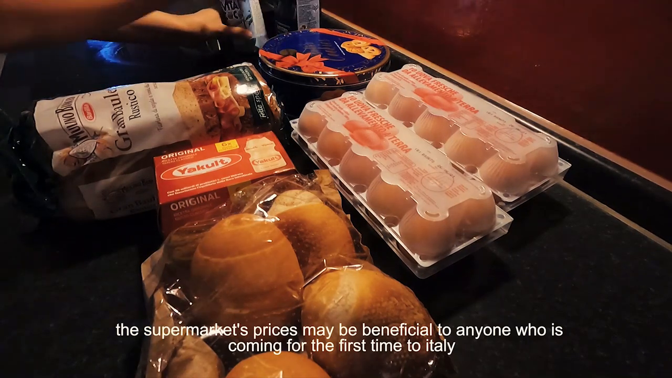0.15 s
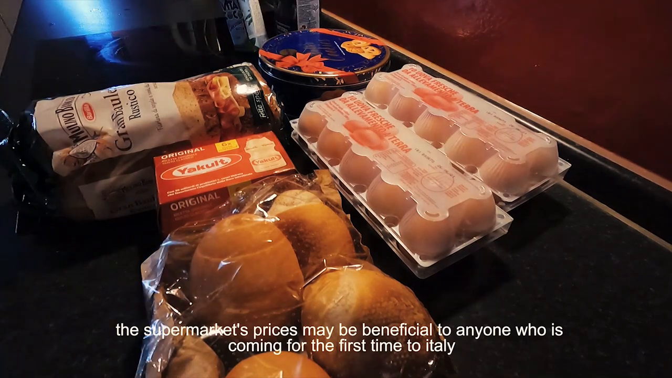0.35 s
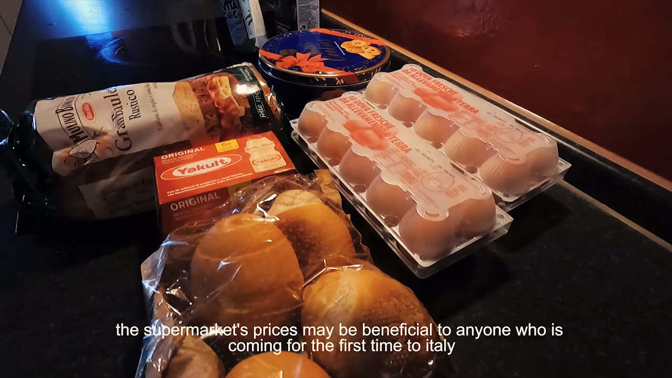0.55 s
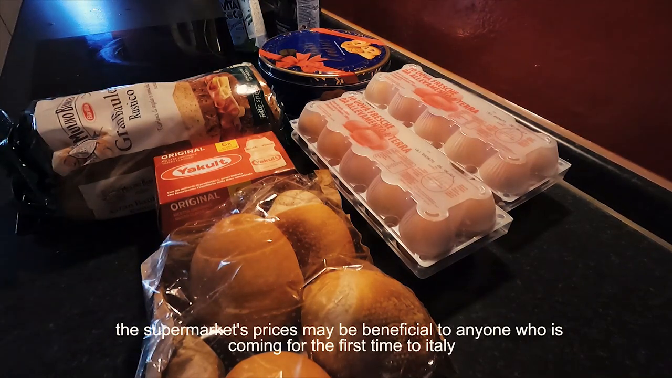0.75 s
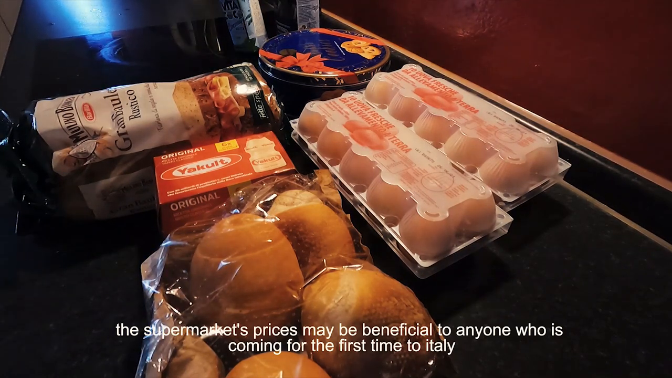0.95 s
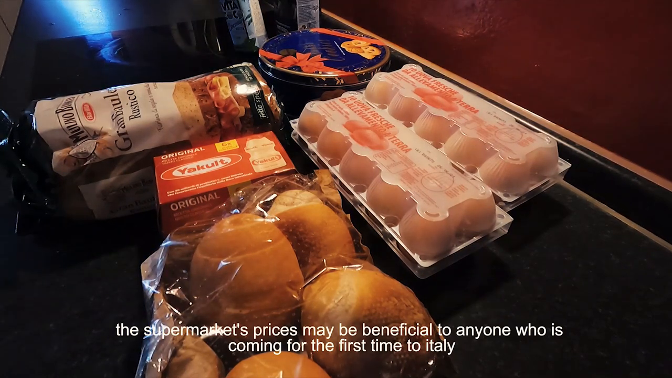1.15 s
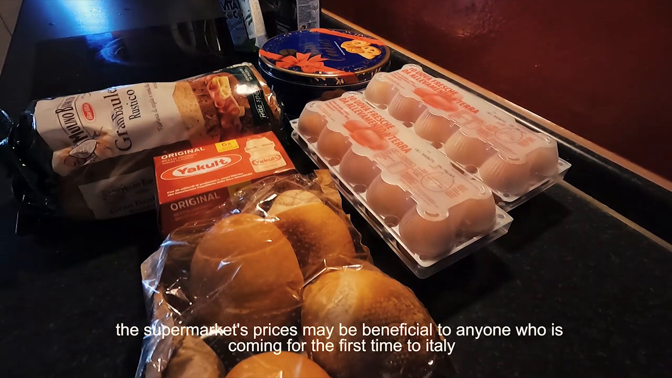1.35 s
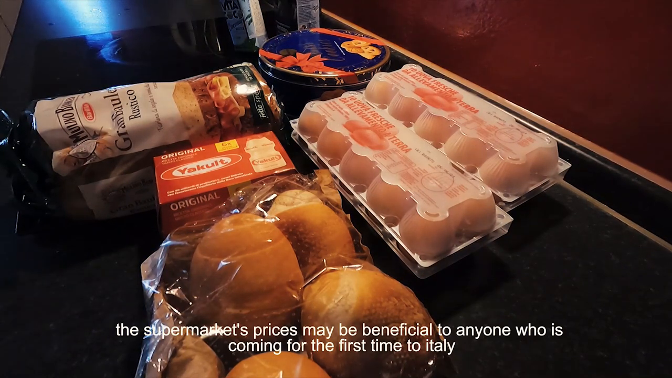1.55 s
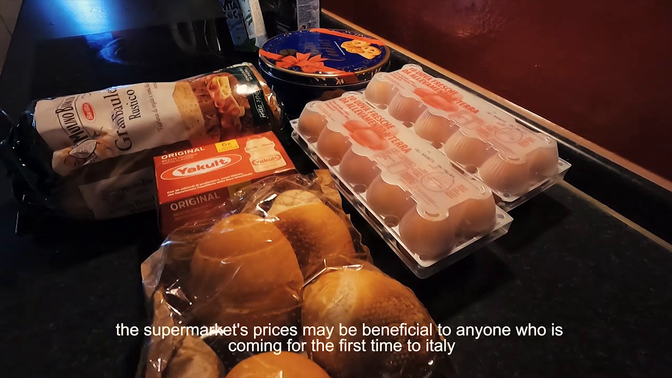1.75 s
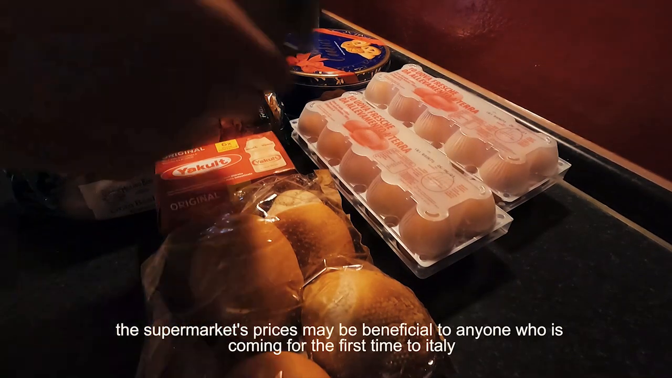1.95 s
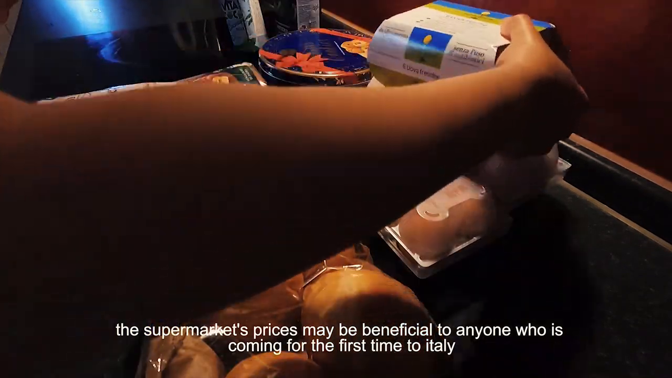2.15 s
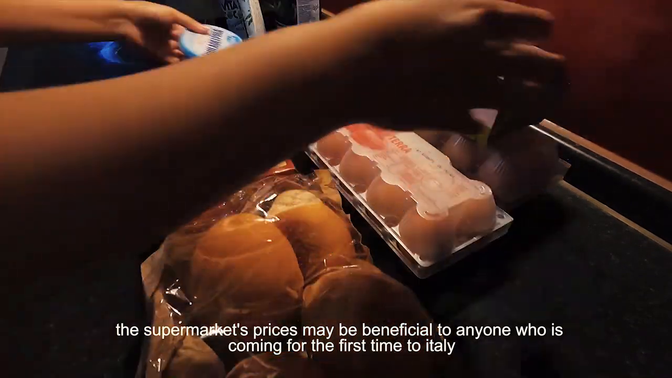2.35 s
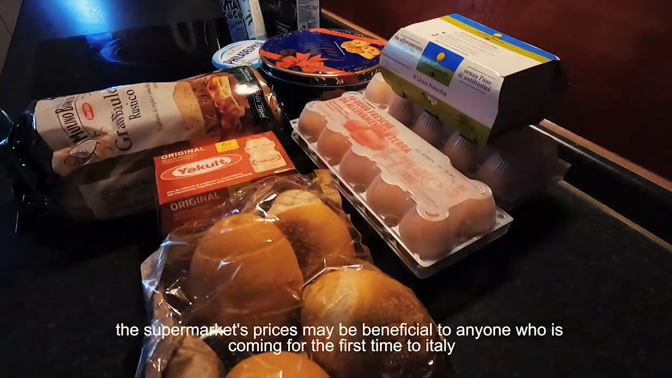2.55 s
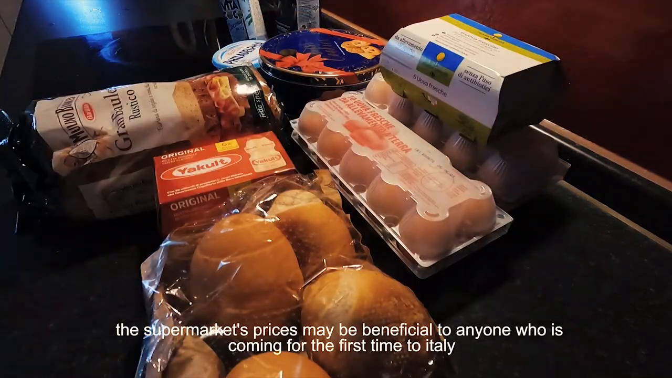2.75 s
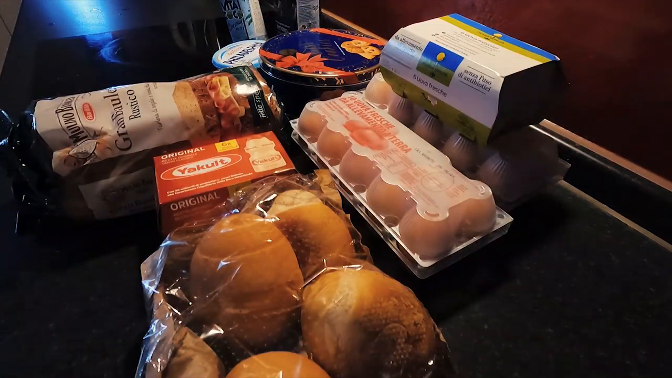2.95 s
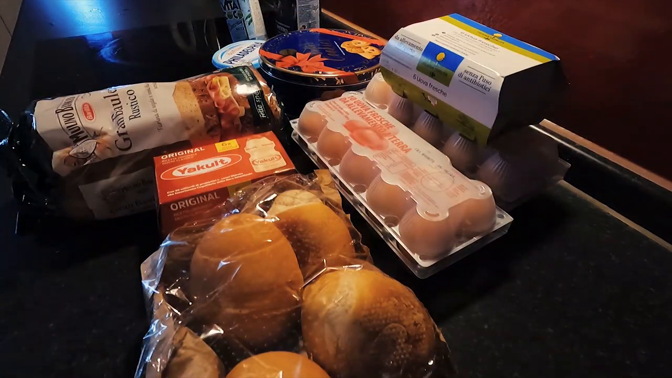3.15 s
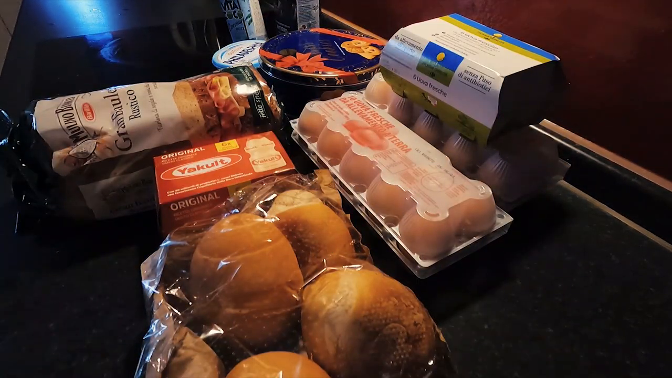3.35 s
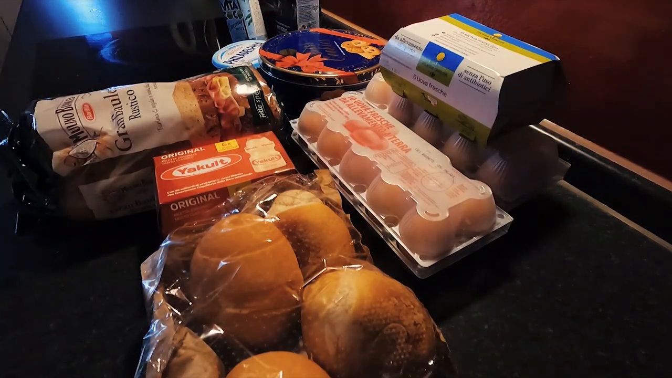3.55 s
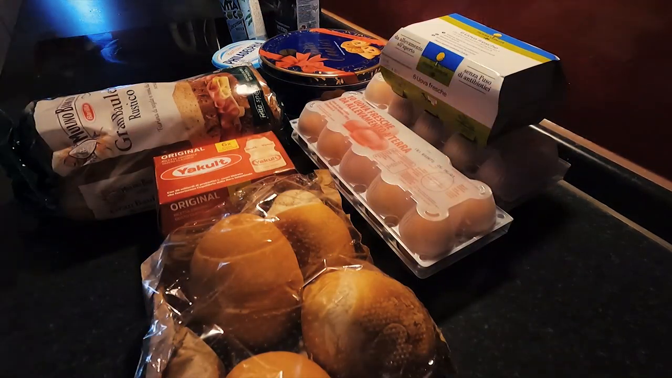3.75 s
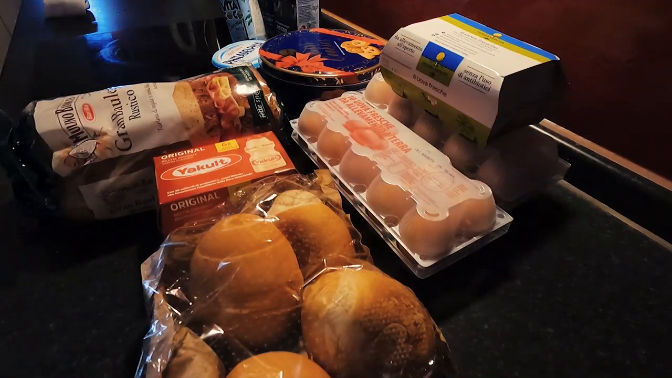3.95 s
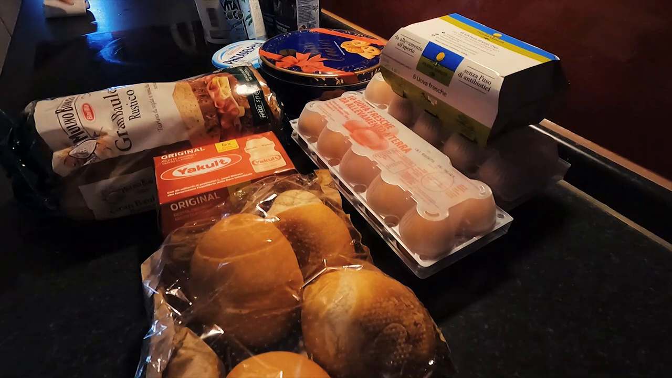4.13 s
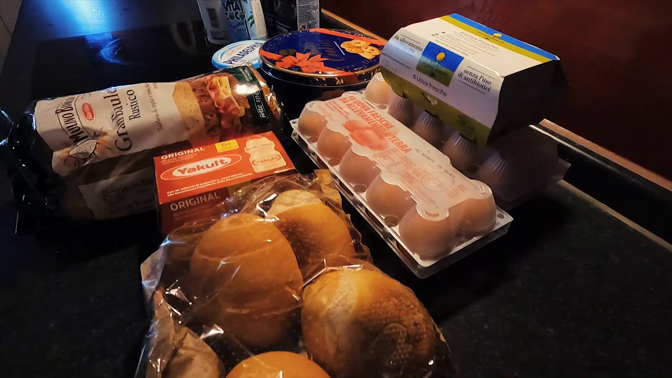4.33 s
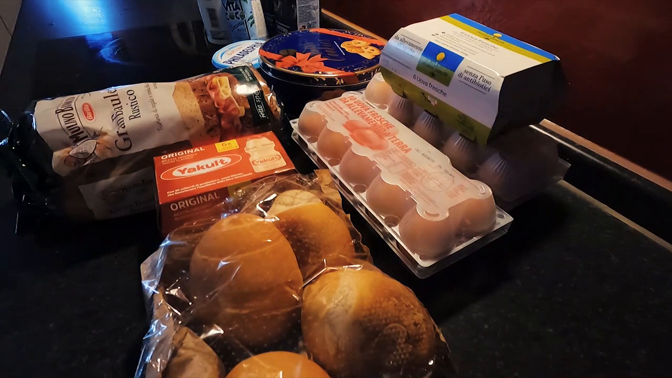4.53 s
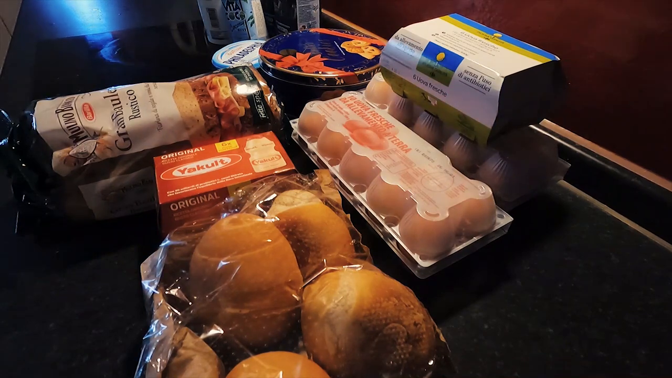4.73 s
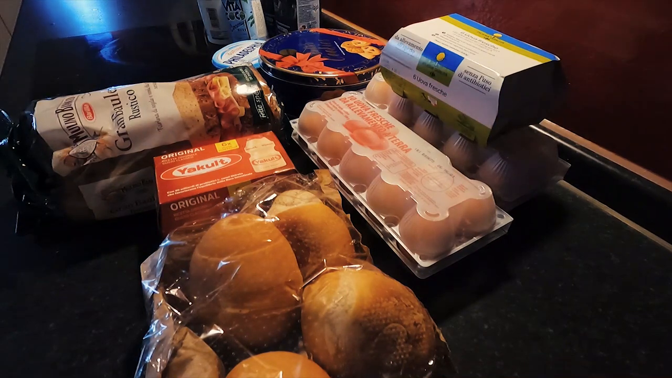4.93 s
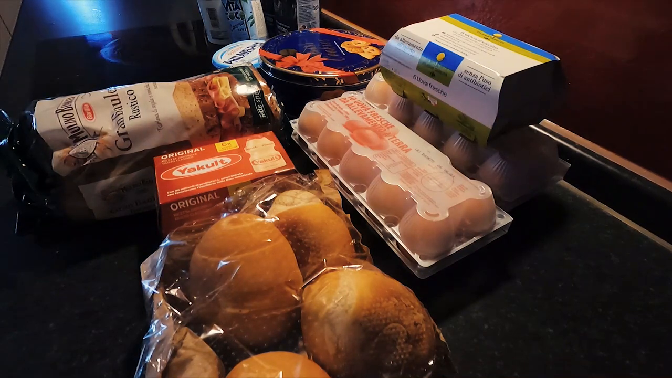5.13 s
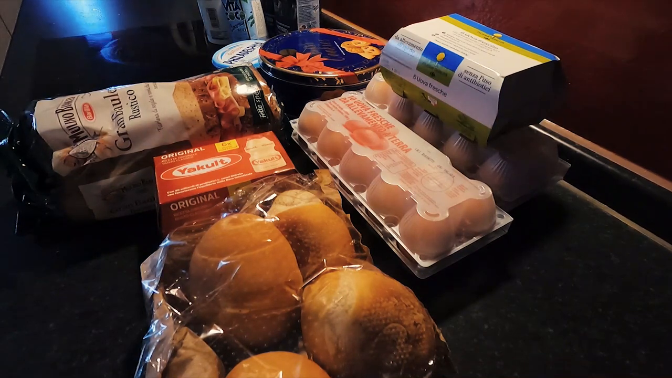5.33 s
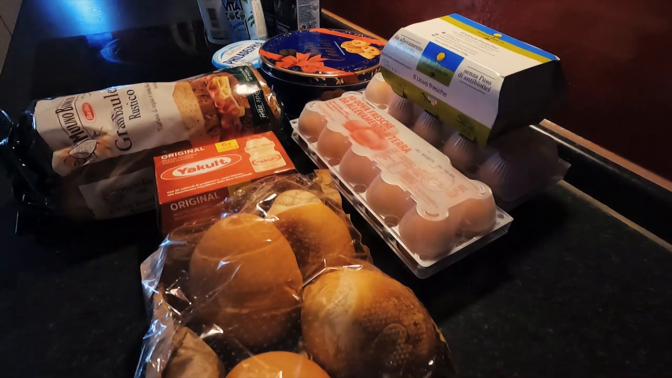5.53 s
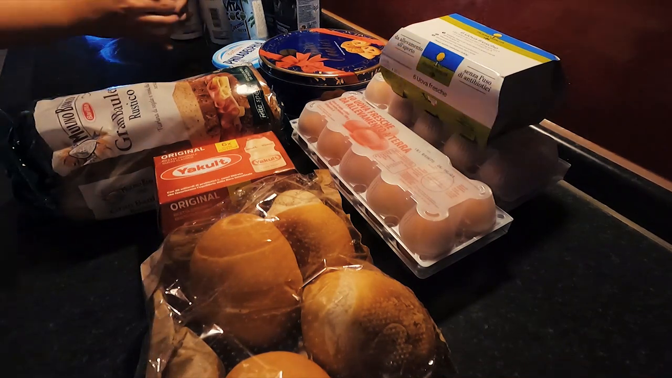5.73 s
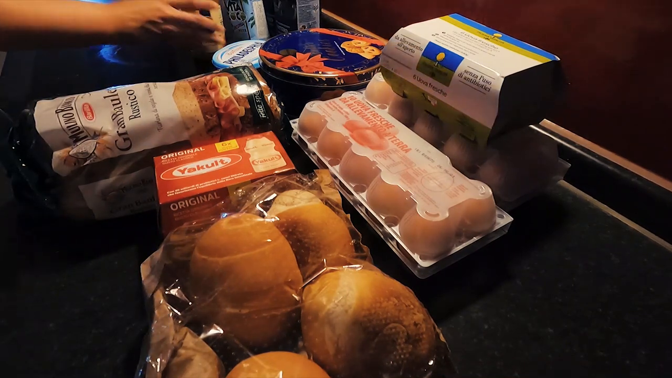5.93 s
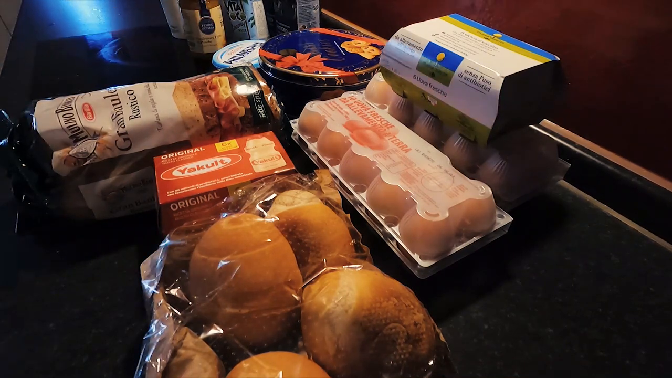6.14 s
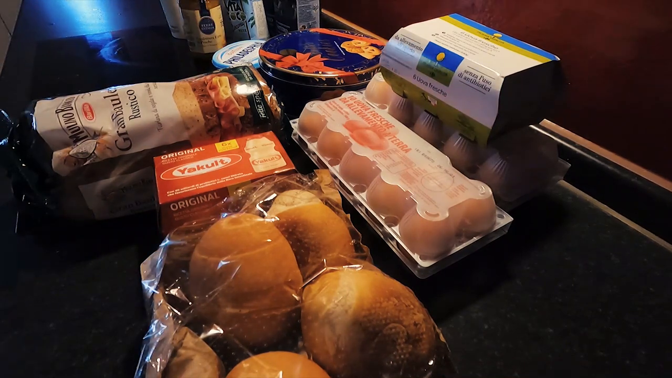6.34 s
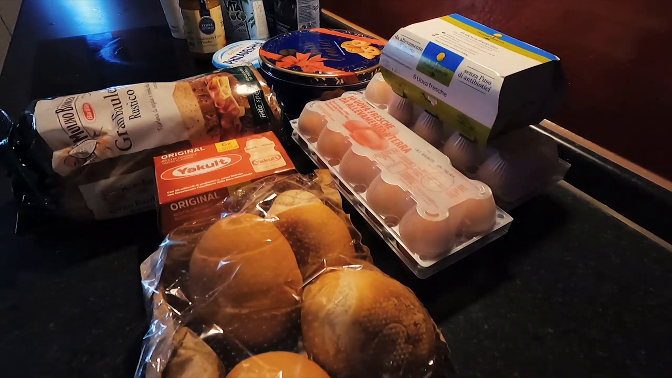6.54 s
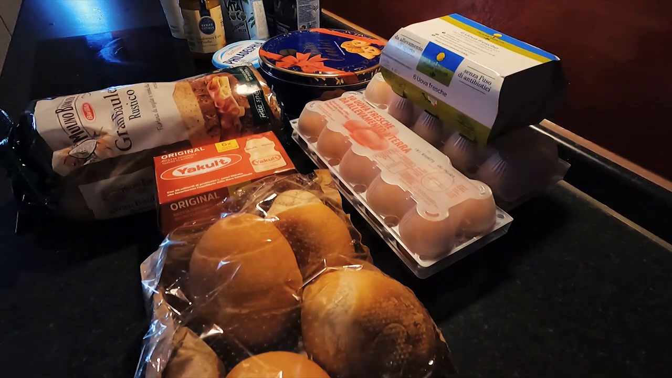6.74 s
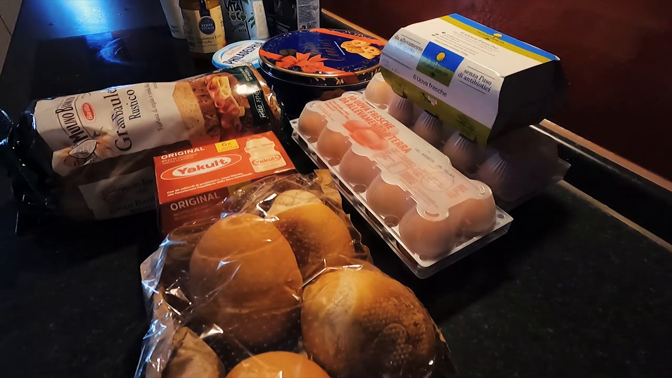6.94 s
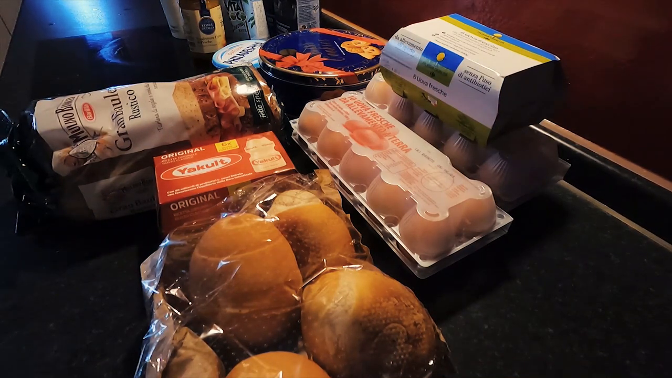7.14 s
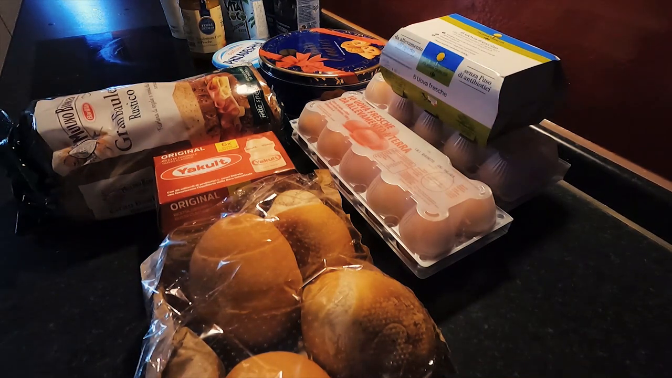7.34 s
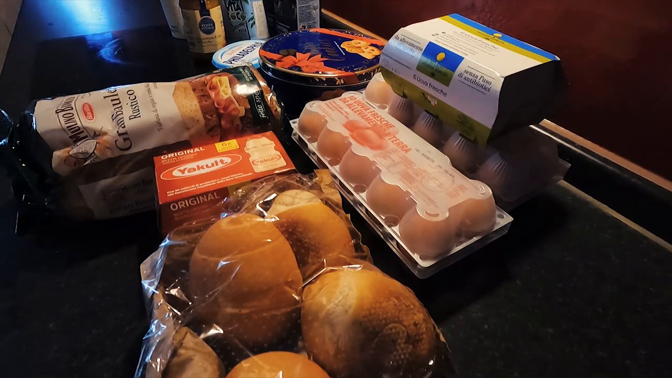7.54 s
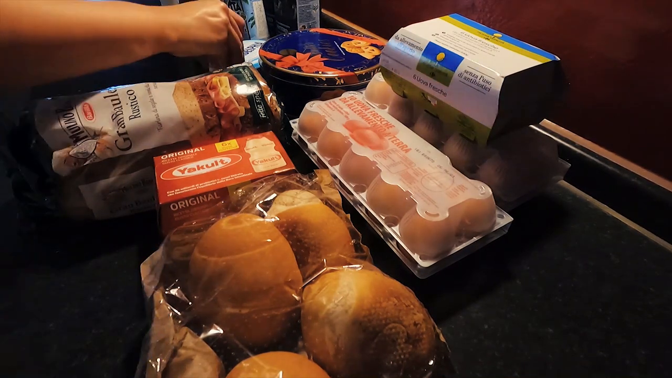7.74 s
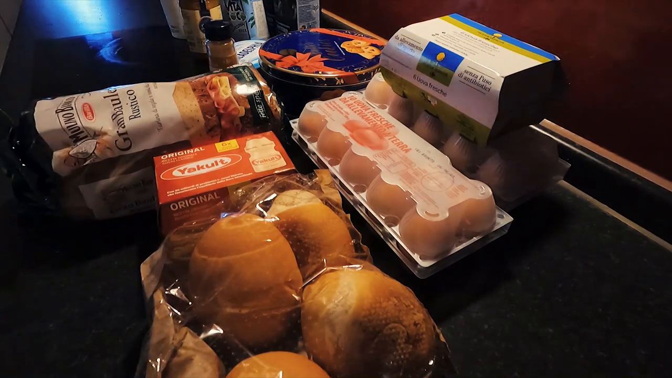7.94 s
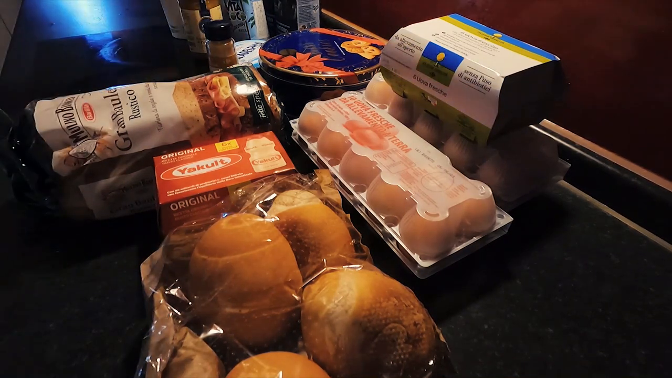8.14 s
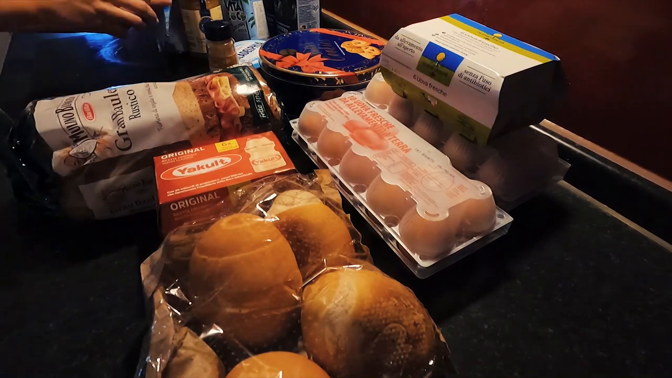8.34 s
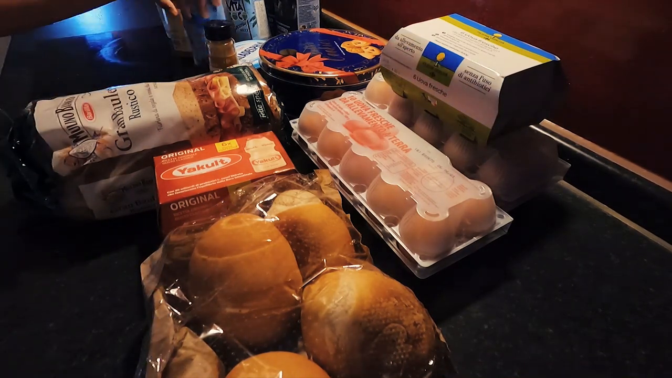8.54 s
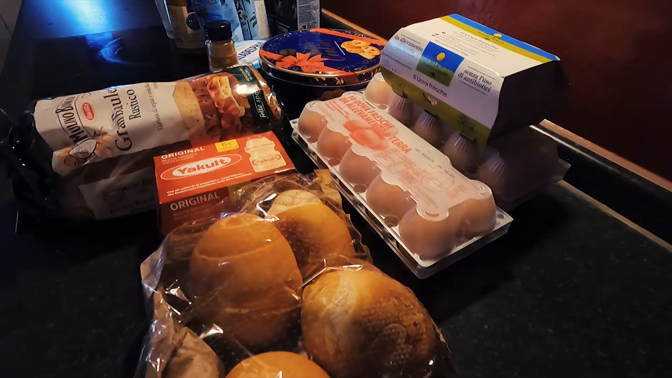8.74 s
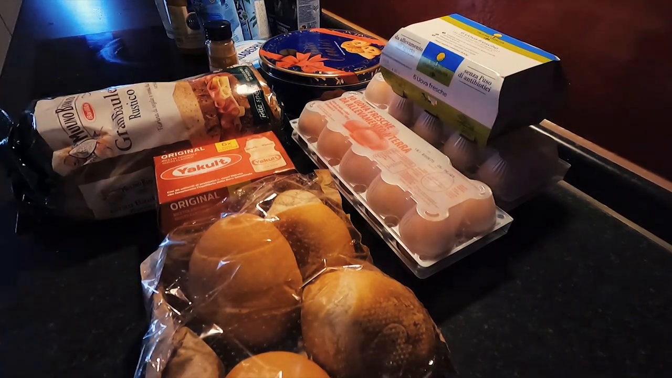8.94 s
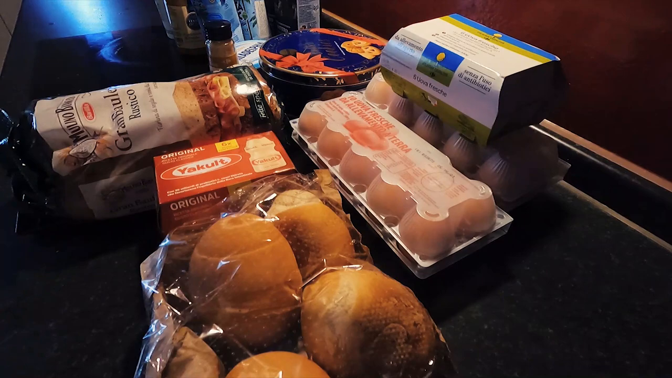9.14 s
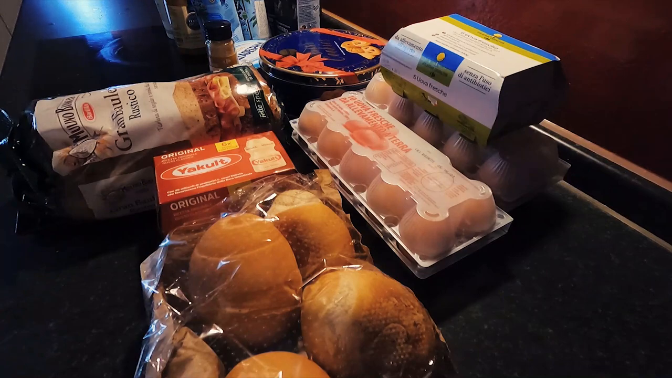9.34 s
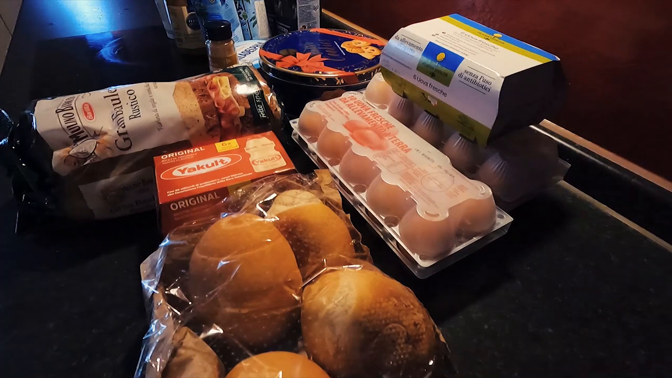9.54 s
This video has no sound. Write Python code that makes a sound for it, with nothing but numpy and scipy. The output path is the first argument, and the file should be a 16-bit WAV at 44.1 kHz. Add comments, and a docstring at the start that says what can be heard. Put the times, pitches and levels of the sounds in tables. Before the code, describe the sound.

Groceries are set down on a kitchen counter: a thin plastic egg carton crackles, then packs and a bottle knock and thud between soft rustles.

```python
"""A small, dry kitchen: groceries are set down on the counter, close to a small stereo microphone.
Footfalls and soft loads thud as damped counter modes; packs and a bottle knock with body, wall and edge.
A thin plastic egg carton snaps in short noise bursts over a hollow shell; packs scuff and wrappers rustle
as sprays of tiny slips. Weight shudders in low noise, and a fine hiss wavers over a soft, hollow drone."""
import sys
import numpy as np
from scipy import signal
from scipy.io import wavfile
from scipy.ndimage import uniform_filter1d, map_coordinates

SR = 44100
rng = np.random.default_rng(int(sys.argv[2]) if len(sys.argv) > 2 else 0)


def to_wav(sig):
    """Store sig (one row per channel, or 1-D mono) as 16-bit WAV at the path in sys.argv[1].

    Samples outside -1..1 are clipped; the rate is SR.
    """
    pcm = np.clip(np.atleast_2d(sig), -1, 1) * 32767
    pcm = np.round(pcm).astype(np.int16)
    wavfile.write(sys.argv[1], SR, pcm.T)  # frames by channels


N = 426869
TIME = np.arange(N) / SR
HIT = TIME[:SR // 5]  # time axis of one short event, 0.2 s
HZ = np.fft.rfftfreq(4096, 1 / SR)  # frequency axis of the spectral filters


def amp(db):
    """Decibels to gain."""
    return np.exp(np.asarray(db) * (np.log(10) / 20))


def read(points, hz):
    """A spectrum read on a log-frequency axis."""
    f, value = np.transpose(points)
    return np.interp(np.log(hz + 1), np.log(f + 1), value)


def follow(curve):
    """A dB curve as a gain for every sample."""
    return amp(np.interp(TIME, *np.transpose(curve)))


def evened(x):
    """Scales to rms 1."""
    return x / np.sqrt(np.mean(x ** 2) + 1e-20)


def struck(x):
    """Scales a hit so that its energy equals 10 ms at rms 1."""
    energy = np.sum(x ** 2, -1, keepdims=True)
    return x / np.sqrt(energy / (.01 * SR) + 1e-20)


def add(mix, s, sound):
    """Mixes a sound in at time s, in seconds."""
    part = mix[:, max(round(s * SR), 0):][:, :sound.shape[-1]]
    part += sound[..., :part.shape[1]]


def colour(x, points, tilt=0):
    """Causal, minimum-phase filter with the given spectrum, tilted above 1 kHz by dB per octave."""
    octaves = np.log2(np.maximum(HZ / 1000, 1))
    log_gain = np.log(amp(read(points, HZ) + tilt * octaves))
    circle = np.concatenate([log_gain, log_gain[-2:0:-1]])
    # the Hilbert transform of the log gain supplies the phase
    response = np.exp(np.conj(signal.hilbert(circle)))
    taps = np.fft.ifft(response).real[:len(HZ) // 2]
    return signal.oaconvolve(x, taps[None], axes=1)[:, :x.shape[1]]


def band(x, low_hz, high_hz, order):
    """Causal band-pass."""
    return signal.sosfilt(signal.butter(order, [low_hz, high_hz], "band", fs=SR, output="sos"), x)


def ring(modes, contact, detune):
    """Dying modes, driven by a smooth push that lasts for the contact time in seconds."""
    sound = np.zeros(len(HIT))
    for hz, db, t60 in modes:
        pitch = hz * (1 + detune * rng.standard_normal())
        sound += amp(db - 60 * HIT / t60) * np.cos(2 * np.pi * pitch * HIT)
    push = np.sin(np.pi * np.minimum(HIT / contact, 1)) ** 2
    return signal.fftconvolve(sound, push)[None, :len(HIT)]


def rebounds(x, share, mean_gap):
    """Nearby surfaces return a few quick, uneven copies of a blow."""
    taps = np.zeros(len(HIT))
    delays = np.minimum(0.00393 + np.cumsum(rng.exponential(mean_gap, size=9)), .15)
    signs = rng.choice([-1, 1], size=9)
    taps[(delays * SR).astype(int)] = share * signs * np.exp(-delays / .028)
    taps[0] = 1
    return signal.fftconvolve(x, taps[None], axes=1)[:, :len(HIT)]


def crack(points, decay, rise, chatter, tilt=0):
    """A burst of coloured noise; the surfaces chatter a few times before they settle."""
    envelope = np.exp(-HIT / decay) * (1 - np.exp(-HIT / rise))
    contacts = np.zeros(len(HIT))
    delays = np.minimum(rng.exponential(0.0086, size=4), .04)
    contacts[(delays * SR).astype(int)] = chatter * rng.random(size=4) * np.exp(-delays / 0.036)
    contacts[0] = 1
    envelope = signal.fftconvolve(contacts, envelope)[:len(HIT)]
    return struck(colour(rng.standard_normal((2, len(HIT))) * envelope, points, tilt))


def grains(size, per_s, spread_db, smooth):
    """Tiny slips of uneven size over a smooth rubbing noise."""
    sizes = amp(spread_db * np.minimum(rng.exponential(1, size), np.pi))
    slips = (rng.random(size) < per_s / SR) * sizes
    slips = evened(slips * rng.choice([-1., 1.], (2, size)))
    return evened(slips + smooth * rng.standard_normal((2, size)))


def ripple(depth_db, size):
    """Random narrow peaks and dips, in dB for every bin."""
    chance = rng.standard_normal(len(HZ))
    return depth_db * evened(signal.fftconvolve(chance, np.hanning(size), "same"))


def creased(points, depth_db):
    """A spectrum with the chance resonances of one fold of thin plastic."""
    return np.column_stack([HZ, read(points, HZ) + ripple(depth_db, size=35)])


def waver(seconds):
    """Smooth chance of rms 1 that changes over the given time."""
    knots = rng.standard_normal(N // 100)
    return evened(map_coordinates(knots, [TIME / seconds], order=3, mode="mirror"))


# Spectrum of the hollow drone in the room. Each row: frequency in Hz, relative level in dB.
DRONE_SPECTRUM = [(20, -21), (50, -19), (130, -23), (215, -13.5), (400, -21), (580, -22.5), (740, -5),
                  (930, -1), (1100, -12.5), (1350, -16.5), (1600, -12.5), (2600, -25), (5000, -26.5)]
# Faint hum in the middle of the image. Each row: frequency in Hz, level in dB.
HUM_TONES = [(936, -69), (1564, -78)]
# Spectrum of the fine hiss. Each row: frequency in Hz, relative level in dB.
HISS_SPECTRUM = [(1000, -38.5), (2500, -19), (4200, -26.5), (5400, -4.5), (7000, -2.5), (9500, -3.5),
                 (10400, -2.5), (11200, 3.5), (12200, -2.5), (14500, -3), (16000, -4.5)]
# Level of the hiss before it wavers. Each row: time in seconds, level in dB.
HISS_LEVEL = [(0.0, -62), (0.48, -60.5), (0.83, -59), (1.78, -57), (2.78, -61), (3.85, -56.5),
              (4.39, -61.5), (5.34, -56), (5.69, -60.5), (7.14, -58), (7.6, -68), (8.52, -66), (9.1, -66),
              (9.44, -56.5), (9.68, -60)]
HISS_WAVER_DB, HISS_WAVER_S = 2.2, .06  # rms depth and time scale of the random wavering


def background():
    """A soft hollow drone of noise with a thin, slightly drifting hum, under a fine, wavering hiss."""
    air = amp(-62.5) * evened(colour(rng.standard_normal((2, N)), DRONE_SPECTRUM))
    drift = waver(.12)
    for tone_hz, db in HUM_TONES:
        phase = 2 * np.pi * np.cumsum(tone_hz * (1 + 0.001736 * drift)) / SR
        air[0] += amp(db) * evened(np.sin(phase))
    _, _, z = signal.stft(rng.standard_normal((2, N)), SR, nperseg=512)
    # the hiss shimmers in narrow, slowly shifting patches
    patches = uniform_filter1d(rng.standard_normal(z.shape[1:]), size=2, axis=0)
    patches = evened(uniform_filter1d(patches, size=30, axis=1))
    shimmer = signal.istft(z * amp(2.8 * patches), SR)[1][:, :N]
    hiss = follow(HISS_LEVEL) * evened(colour(shimmer, HISS_SPECTRUM))
    return air + amp(HISS_WAVER_DB * waver(HISS_WAVER_S)) * hiss


# Decay of the small kitchen. Each row: frequency in Hz, time to fall 60 dB in seconds.
KITCHEN_DECAY = [(200, 0.12), (600, 0.053), (1500, 0.1), (5000, 0.1), (9000, 0.078), (15000, 0.08)]


def kitchen(x, wet_db, gap):
    """Close walls and cupboards return a short, dense tail that starts after the gap in seconds."""
    t = TIME[:SR // 2]
    taps = rng.standard_normal((2, len(t))) * (rng.random(len(t)) < 5000 / SR) * (t > gap)
    hz, at, z = signal.stft(taps, SR, nperseg=256)
    decay = amp(-60 * at / read(KITCHEN_DECAY, hz)[:, None])
    tail = signal.istft(z * decay, SR)[1]
    tail /= np.linalg.norm(tail, axis=1, keepdims=True)
    return x + amp(wet_db) * signal.oaconvolve(x, tail, axes=1)[:, :N]


# Packs and a bottle meeting the counter. Each row: start in seconds, body level in dB,
# favoured pitch of the ring in Hz, clack level in dB, click level in dB.
LANDINGS = [(0.118, -48, 910, -66, -66), (0.156, -48.5, 785, -56, -55), (1.79, -41, 770, -53, -46),
            (1.868, -43.5, 890, -47.5, -47.5), (2.467, -27.5, 496, -36.5, -37.5),
            (2.499, -26, 494, -44, -43), (2.541, -37.5, 775, -45.5, -47), (2.563, -50, 910, -69, -61),
            (3.285, -32.5, 800, -55, -39), (3.835, -43.5, 910, -79, -62), (3.93, -31.5, 482, -55, -51.5),
            (4.218, -27, 560, -43.5, -52), (4.263, -20.5, 535, -38.5, -36), (5.815, -40, 338, -41, -46),
            (5.926, -20.5, 620, -28, -24.5), (5.988, -36.5, 786, -40.5, -40.5),
            (6.097, -53.5, 856, -55.5, -55), (6.511, -47, 900, -76, -57), (6.757, -33.5, 470, -60, -45.5),
            (7.915, -43.5, 710, -56, -60), (8.218, -44, 845, -63, -52.5), (8.283, -35, 301, -47, -45.5),
            (8.318, -26.5, 322, -38, -40.5), (8.418, -43.5, 520, -56, -53.5), (8.442, -42.5, 484, -56, -78),
            (8.536, -46, 334, -53.5, -49.5), (8.586, -39, 725, -49.5, -48), (8.609, -27, 493, -36, -35.5),
            (8.626, -25.5, 574, -29, -26.5), (8.697, -42, 836, -50, -57)]
# Body modes of a pack. Each row: frequency in Hz, relative level in dB, 60 dB decay in seconds.
PACK_MODES = [(230, -11, .03), (310, -4, .035), (410, -5, .025), (495, 1, .06), (590, 0, .024),
              (700, 2, .03), (800, 3, .036), (890, 1, .04), (1130, -5, .04)]
# Stiff walls of the packs. Each row: frequency in Hz, relative level in dB, 60 dB decay in seconds.
WALL_MODES = [(1072, 4.5, 0.11), (1260, -8, 0.05), (1515, -23, 0.088), (2100, 3, .12), (2665, -38, 0.042),
              (2670, -25, 0.25), (3440, -9, 0.22)]
# Noise spectrum of the wall's clack. Each row: frequency in Hz, relative level in dB.
CLACK_SPECTRUM = [(500, -18.5), (1000, -4), (1450, 1.5), (1750, -1.5), (2050, -4), (2800, -6.5),
                  (3800, -7.5), (5500, -34), (9000, -50)]
# Noise spectrum of the edge's click. Each row: frequency in Hz, relative level in dB.
CLICK_SPECTRUM = [(1500, -38), (3300, -21), (4600, 5), (7500, 4), (9500, 1), (13000, -1.5), (16000, -9)]


def knocks():
    """A pack lands: its body rings, its wall clacks and its edge clicks."""
    bodies, tops = np.zeros((2, 2, N))
    for s, db, hz, clack_db, click_db in LANDINGS:
        # the place of contact favours the body modes near one pitch
        modes = [(f, level - 18 * abs(np.log2(f / hz)), t60) for f, level, t60 in PACK_MODES]
        body = band(ring(modes, contact=0.00079, detune=0.02), 225, 976, order=3)
        wall = struck(ring(WALL_MODES, contact=0.00024, detune=0.0099))
        clack = crack(CLACK_SPECTRUM, decay=0.0024, rise=0.0023, chatter=0.65) + 0.37 * wall
        click = crack(CLICK_SPECTRUM, decay=0.0013, rise=0.0014, chatter=0.53)
        add(bodies, s - .0004, amp(db) * struck(rebounds(body, share=0.15, mean_gap=.005)))
        add(tops, s, amp(clack_db) * clack)
        add(tops, s, amp(click_db) * click)
    return kitchen(bodies, wet_db=-5.5, gap=0.0069) + kitchen(tops, wet_db=-7.5, gap=.006)


# Dull thuds of feet and soft loads. Each row: start in seconds, level of the lower resonances in dB,
# hardness as the upper resonances over the lower in dB.
FEET_AND_LOADS = [(0.199, -44, -2.5), (0.473, -35, -8), (0.584, -41.5, -4), (0.675, -49.5, -7),
                  (1.675, -38.5, -17), (2.794, -35, 0), (3.446, -40.5, -10.5), (3.579, -33, -16),
                  (3.697, -45.5, -10), (3.93, -32.5, -22), (3.954, -35, 3), (4.522, -27.5, -2.5),
                  (4.632, -38.5, 0), (5.521, -42.5, -11.5), (5.653, -29, -6.5), (5.762, -40.5, -19),
                  (5.816, -26, -3.5), (6.242, -34.5, -7.5), (6.366, -41, -1), (7.448, -41, -8),
                  (7.573, -31.5, -6.5), (8.285, -29.5, -7.5), (8.295, -24.5, -1.5), (8.519, -33, -6),
                  (8.739, -39, -4), (8.954, -29, -2), (9.06, -39.5, -1.5)]
# Lower modes of the counter. Each row: frequency in Hz, relative level in dB, 60 dB decay in seconds.
COUNTER_LOW_MODES = [(155, -23, .06), (207, -12, .045), (288, 0, .048), (360, -5, .04)]
# Upper modes of the counter. Each row: frequency in Hz, relative level in dB, 60 dB decay in seconds.
COUNTER_HIGH_MODES = [(494.5, 7, 0.039), (694, -6, 0.04), (775, -8, 0.044), (946, -8.5, 0.083)]
THUD_PITCH_SPREAD = .05  # random spread of each mode's pitch from thud to thud, as a share


def thuds():
    """Each thud rings the same counter; harder ones reach its upper modes."""
    out = np.zeros((2, N))
    for s, db, hard_db in FEET_AND_LOADS:
        low = ring(COUNTER_LOW_MODES, contact=0.0016, detune=THUD_PITCH_SPREAD)
        low = rebounds(band(low, 162.0, 382, order=3), share=0.28, mean_gap=.0035)
        top = ring(COUNTER_HIGH_MODES, contact=0.00096, detune=THUD_PITCH_SPREAD)
        top = rebounds(band(top, 415, 960, order=4), share=0.26, mean_gap=0.0038)
        add(out, s - .0012, amp(db) * struck(low))
        add(out, s + 0.0007, amp(db + hard_db) * struck(top))
    return out


# Weight shifting against the counter. Each row: start in seconds, level at the height of the swell
# in dB, length in seconds (held to 0.2 at most).
WEIGHT_SHIFTS = [(0.323, -55.5, 0.076), (0.883, -38.5, 0.0055), (1.002, -52, 0.013), (2.136, -61, 0.09),
                 (2.792, -52, 0.021), (3.925, -48, 0.11), (4.723, -63, 0.23), (6.406, -44, 0.089)]
# Spectrum of the shudder before its band-pass. Each row: frequency in Hz, relative level in dB.
SHUDDER_SPECTRUM = [(20, -25), (50, 5), (110, 0.5), (160, -12), (260, -10), (420, -19), (900, 6.5),
                    (3000, -36)]
SHUDDER_HZ = 152  # middle of the band


def rumbles():
    """Shifting weight makes the counter shudder: low noise that swells and fades once."""
    out = np.zeros((2, N))
    for s, db, length in WEIGHT_SHIFTS:
        noise = colour(rng.standard_normal((2, len(HIT))), SHUDDER_SPECTRUM)
        shudder = evened(band(noise, SHUDDER_HZ / 1.35, SHUDDER_HZ * 1.6, order=2))
        swell = np.sin(np.pi * np.minimum(HIT / min(length, HIT[-1]), 1)) ** 2
        add(out, s, amp(db) * shudder * swell)
    return out


# Arm movements that stir sleeves and bags. Each row: start in seconds, length in seconds, level in dB.
ARM_MOVES = [(0.728, 0.56, -57), (1.157, 1, -56), (2.875, 0.93, -64.5), (4.612, 0.93, -60.5),
             (6.496, 1, -67.5)]
# Spectrum of sliding wrappers and packs. Each row: frequency in Hz, relative level in dB.
SLIDE_SPECTRUM = [(100, -30.5), (500, -21.5), (850, 8), (1250, -6), (1900, 4.5), (2800, -5.5), (5200, -1.5),
                  (8000, -6), (12000, -10.5), (16000, -20)]
MOVE_ATTACK_S, MOVE_RELEASE_S = 0.075, 0.36


def rustle():
    """Each movement swells, holds and fades; three folds crackle, each in its own clumps and colour."""
    folds = np.zeros((2, N))
    for fold in range(3):
        clumps = uniform_filter1d(rng.standard_normal(N), size=800)
        clumps = evened(uniform_filter1d(clumps, size=300))
        slips = grains(N, per_s=700, spread_db=5, smooth=.5) * amp(4.5 * clumps)
        folds += colour(slips, creased(SLIDE_SPECTRUM, depth_db=5), tilt=0.063)
    movement = np.zeros(N)
    for start, length, db in ARM_MOVES:
        attack = (TIME - start) / MOVE_ATTACK_S
        release = (start + length - TIME) / MOVE_RELEASE_S
        movement += amp(db) * np.clip(np.minimum(attack, release), 0, 1)
    return movement * evened(folds)


# Packs and wrappers sliding. Each row: start in seconds, level in dB before the stroke shapes it,
# brightness as a pitch in Hz that sets the tilt, length of the stroke in seconds.
SLIDES = [(0.741, -46, 5400, 0.021), (0.836, -45, 5660, 0.046), (0.8774, -42.5, 1770, 0.061),
          (0.959, -52, 5900, 0.12), (1.1644, -52, 1790, 0.076), (1.2878, -46.5, 2040, 0.1),
          (1.5255, -46.5, 3180, 0.093), (1.622, -41, 2400, 0.033), (1.788, -35, 2430, 0.027),
          (2.008, -41.5, 5020, 0.024), (2.302, -43.5, 4770, 0.06), (2.3607, -38, 8140, 0.021),
          (2.9637, -48, 1780, 0.057), (3.275, -40, 1980, 0.069), (3.6995, -43.5, 11600, 0.067),
          (4.894, -43.5, 1480, .1), (5.153, -51.5, 1420, 0.11), (5.2367, -51, 1440, 0.077),
          (5.3494, -47.5, 1520, .04), (5.4844, -56, 1690, 0.073), (6.508, -46.5, 1800, 0.057),
          (6.5903, -55, 1570, 0.33), (6.662, -46.5, 4300, 0.052), (6.752, -38, 2060, 0.045),
          (6.8827, -36.5, 3200, 0.021), (6.9205, -43.5, 2490, 0.11), (7.013, -48.5, 6950, 0.052),
          (7.198, -53, 1800, 0.056), (7.491, -47.5, 2150, 0.031), (7.638, -47.5, 5300, 0.018),
          (9.1744, -58, 1580, 0.12), (9.434, -46.5, 5540, 0.04)]


def scuffs():
    """Short slides swell quickly and die away in a spray of slips."""
    out = np.zeros((2, N))
    for s, db, hz, length in SLIDES:
        slips = grains(len(HIT), per_s=1800, spread_db=5, smooth=.5)
        surface = creased(SLIDE_SPECTRUM, depth_db=1.8)
        rub = evened(colour(slips, surface, tilt=3.65 * np.log2(hz / 3200)))
        stroke = (1 - np.exp(-HIT / 0.003)) * np.exp(-(HIT / (.5 * length)) ** 1.67)
        add(out, s - .003, amp(db) * stroke * rub)
    return out


# Thin plastic buckling. Each row: time of the snap in seconds, snap level in dB,
# brightness as a pitch in Hz that sets the tilt, level of the hollow shell in dB.
BUCKLES = [(0.8829, -48.5, 2190, -49.5), (1, -48.5, 2500, -54), (1.771, -47, 10500, -55),
           (1.793, -44, 2530, -45), (1.9376, -42, 4870, -49), (1.9468, -43.5, 2820, -62),
           (1.9674, -40, 5130, -39), (1.9934, -50, 4930, -44), (2.0176, -47.5, 5200, -43.5),
           (2.073, -54, 8900, -77), (2.175, -33, 6100, -37), (2.2731, -41, 4630, -41.5),
           (2.3128, -35.5, 7300, -50), (2.374, -37, 7860, -56), (2.6272, -67, 11900, -52),
           (3.0076, -44, 5680, -80), (3.0698, -52, 7510, -76), (3.68, -39, 15840, -59),
           (6.4387, -56.5, 7000, -55), (7.807, -29.5, 8060, -39), (7.8419, -28.5, 7800, -37.5)]
# Spectrum of the snap and its lead-in. Each row: frequency in Hz, relative level in dB.
SNAP_SPECTRUM = [(400, -16.5), (1200, -12), (2000, 5.5), (2700, -0.5), (4000, 6), (5200, 4.5), (8000, 5.5),
                 (11000, 2.5), (16000, -5)]
# Fold that flips in the carton's lid. Each row: frequency in Hz, relative level in dB,
# 60 dB decay in seconds.
FOLD_MODES = [(5070, 3, 0.013), (5490, 4.5, 0.013), (6300, -8, 0.008)]
# Hollow shell of the carton. Each row: frequency in Hz, relative level in dB, 60 dB decay in seconds.
SHELL_MODES = [(512, -2.5, 0.025), (755, -5, 0.042), (862, 0.5, 0.045), (1044, -10, 0.078),
               (1020, -1, 0.013)]
LEAD_IN_DB, SNAP_ROOM_DB = -8, -4.5  # lead-in against the snap's level; kitchen tail against the dry snap


def snaps():
    """Thin plastic snaps and rings its hollow shell; a faint spray of noise grains swells into each snap."""
    lead_ins, flips = np.zeros((2, 2, N))
    swell = np.exp(-HIT[::-1] / 0.0021)  # grows up to the snap
    for s, db, hz, shell_db in BUCKLES:
        plastic = creased(SNAP_SPECTRUM, depth_db=2)
        tilt = 5 * np.log2(hz / 6500)
        snap = crack(plastic, decay=0.0016, rise=0.00077, chatter=0.22, tilt=tilt)
        # the fold rings only in snaps pitched near 5200 Hz
        fold_share = 2.1 * np.exp(-(np.log2(hz / 5200) / 0.11) ** 2)
        snap += fold_share * struck(ring(FOLD_MODES, contact=.0001, detune=0.031))
        shell = ring(SHELL_MODES, contact=0.00022, detune=0.032)
        shell = struck(band(shell, 205, 1320, order=2))
        spray = grains(len(HIT), per_s=540, spread_db=8, smooth=0.19)
        lead_in = evened(colour(spray, SNAP_SPECTRUM)) * swell
        add(lead_ins, s - HIT[-1], amp(db + LEAD_IN_DB) * lead_in)
        add(flips, s, amp(db) * snap + amp(shell_db) * shell)
    return lead_ins + kitchen(flips, wet_db=SNAP_ROOM_DB, gap=0.0027)


def stereo(x, width):
    """Mid and side to left and right, with the side coloured by the width."""
    side = colour(x[1:], width)[0]
    return np.array([x[0] + side, x[0] - side])


# Stereo width of the close handling. Each row: frequency in Hz, side minus mid in dB.
HANDLING_WIDTH = [(40, -22), (130, -13.5), (280, -34), (550, -81), (1100, -25), (2200, -14.5), (4500, -8.5),
                  (12000, -8)]
# Stereo width of the room air. Each row: frequency in Hz, side minus mid in dB.
ROOM_WIDTH = [(60, -6.5), (150, -10.5), (380, -12), (950, -7), (2380, -3.5), (5980, -4), (15000, -4)]


def scene():
    """The handling is close and nearly central; the room air is wider."""
    handling = knocks() + snaps() + kitchen(scuffs(), wet_db=-2.5, gap=.003)
    handling += thuds() + rustle() + rumbles()
    return stereo(handling, HANDLING_WIDTH) + stereo(background(), ROOM_WIDTH)


EDGE_HZ = 16150  # upper band limit


def record(dry):
    """At the stereo microphone the treble leans slightly left; then the band limit."""
    lean = colour(dry, [(1500, -34.0), (5000, -19), (12000, -17.0)])  # Hz, dB
    lean *= np.array([[1], [-1]])  # added on the left, taken away on the right
    low_pass = signal.firwin(301, EDGE_HZ, window=("kaiser", 9), fs=SR)
    return signal.oaconvolve(dry + lean, low_pass[None], "same")


dry = scene()
out = record(dry)
to_wav(out)
```